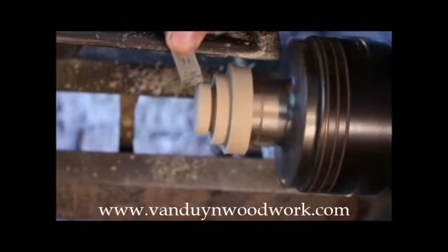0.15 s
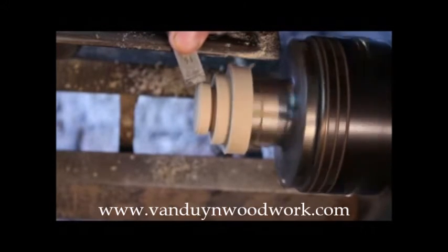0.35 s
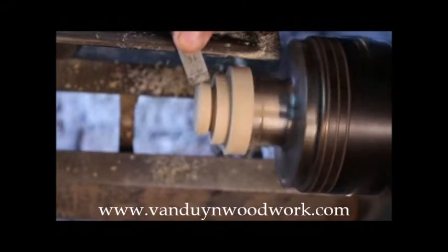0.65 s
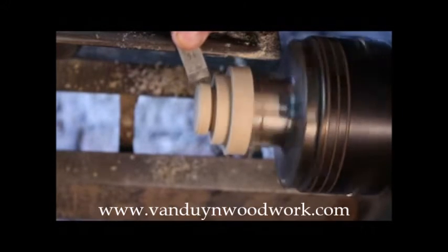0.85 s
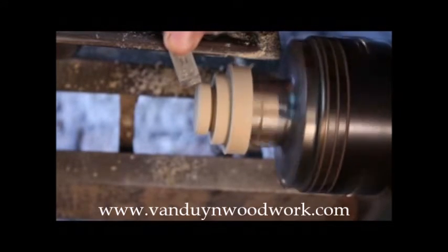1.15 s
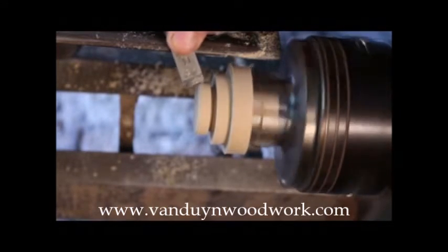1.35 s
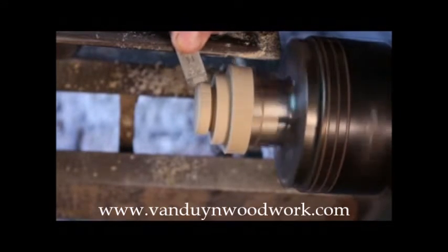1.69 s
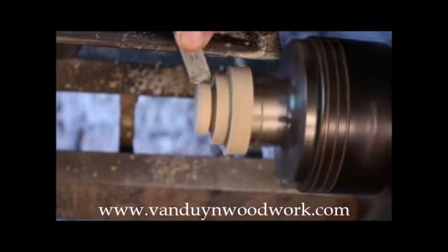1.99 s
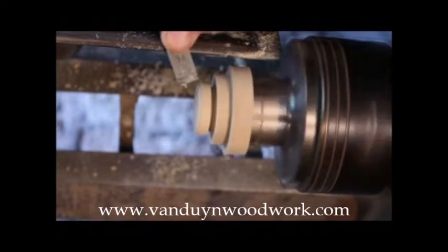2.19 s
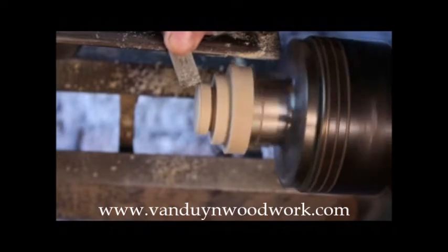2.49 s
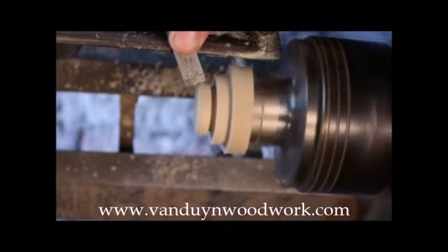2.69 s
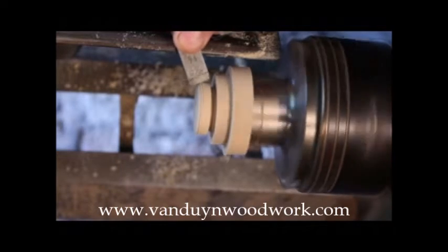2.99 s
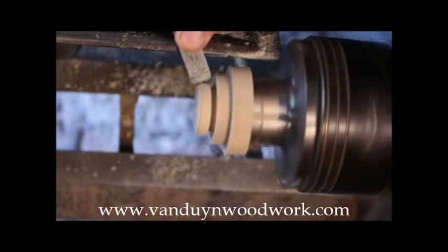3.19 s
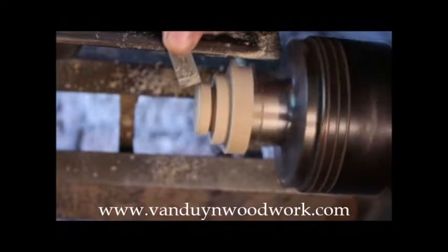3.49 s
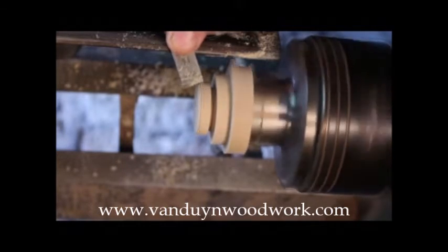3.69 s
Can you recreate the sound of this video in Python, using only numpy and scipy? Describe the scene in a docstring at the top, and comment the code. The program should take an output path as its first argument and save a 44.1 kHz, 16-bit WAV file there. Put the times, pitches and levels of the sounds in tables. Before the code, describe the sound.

Harsh scraping of a toothed tool on spinning wood, repeated four times above soft machine hum

```python
"""Thread chasing at a wood lathe

In a workshop, close to the microphone, a steel chaser is drawn four times along slowly turning wood.
Random clicks of tearing fibres ring the wood, rest, post and tool; the grain colours every turn alike.
Brief falling squeaks come from the edge. Between passes the motor hum and the shop remain,
made of shaped noise and a few sines, with three faint taps of the lifted tool."""
import sys
import numpy as np
from scipy.fft import rfft, irfft, next_fast_len
from scipy.io import wavfile
from scipy.ndimage import map_coordinates

SR = 44100
rng = np.random.default_rng(int(sys.argv[2]) if len(sys.argv) > 2 else 0)


def to_wav(sig):
    """Store sig (one row per channel, or 1-D mono) as 16-bit WAV at the path in sys.argv[1].

    Samples outside -1..1 are clipped; the rate is SR.
    """
    pcm = np.clip(np.atleast_2d(sig), -1, 1) * 32767
    pcm = np.round(pcm).astype(np.int16)
    wavfile.write(sys.argv[1], SR, pcm.T)  # frames by channels


N = 169785


def amp(db):
    """Amplitude factor of a level in dB."""
    return 10 ** (np.asarray(db) / 20)


def unit(x):
    """Scale to an RMS of one."""
    return x / np.sqrt(np.mean(x ** 2) + 1e-20)


def along(points, hz):
    """Read a (frequency, value) curve on a log frequency axis."""
    f, v = np.transpose(points)
    return np.interp(np.log(hz + 1), np.log(f + 1), v)


def wobble(rate):
    """A smooth random curve with rate knots a second."""
    knots = rng.standard_normal(int(N * rate / SR) + 4)
    return map_coordinates(knots, [np.arange(N) * rate / SR])


def filtered(x, response):
    """Filter by a complex response of frequency, with zero padding against wrap-around."""
    size = next_fast_len(N + SR // 2)
    spectrum = rfft(x, size) * response(np.fft.rfftfreq(size, 1 / SR))
    return irfft(spectrum, size)[..., :N]


def resonances(modes):
    """Causal response of damped resonances, summed with alternating sign."""
    def response(f):
        total = 0
        for k, (centre, width, db) in enumerate(modes):
            damping = 1j * f * width
            total = total + (-1) ** k * amp(db) * damping / (centre ** 2 - f ** 2 + damping)
        return total
    return response


def humps(rows, hz):
    """Bell-shaped lifts or dips in dB."""
    return sum(db / (1 + (2 * (hz - centre) / width) ** 2) for centre, width, db in rows)


# Phase lead of the left microphone port over the right: pitch_hz, lead_rad
PORT_LEAD = [(30, 1.2), (80, 0.36), (160, 0.65), (400, .05), (2000, .2), (8000, 1.08)]


def stereo(pair, alike, balance):
    """Mix two unrelated versions into left and right with a set likeness, balance and phase lead."""
    def mid_side(hz):
        angle = np.arccos(np.clip(along(alike, hz), -1, 1)) / 2
        return np.array([np.cos(angle), np.sin(angle)])

    def ports(hz):
        half = amp(along(balance, hz) / 2) * np.exp(.5j * along(PORT_LEAD, hz))
        return np.array([half, 1 / half])

    mid, side = filtered(pair, mid_side)
    return filtered(np.array([mid + side, mid - side]), ports)


# Spectrum of the machine and shop noise before scaling: pitch_hz, level_db (per Hz)
SHOP_SPECTRUM = [(15, -60.5), (25, -22.5), (124, -3), (202, -10.5), (239, -4), (264, -17.5), (345, -6),
                 (389, -12), (484, -7), (648, -11.5), (714, -7), (806, -13), (933, -11.5), (1410, -12.5),
                 (1670, -15), (2180, -20), (6510, -26.5), (7720, -21), (8300, -36.5), (10800, -69),
                 (18300, -120)]
# Casing resonances over that noise: pitch_hz, width_hz, lift_db
CASING = [(77.6, 16, 10), (145, 4.4, 4.5), (310, 45, 3), (607, 34, 6), (922, 60, 2.5), (1117, 35, 12.5),
          (1181, 70, 7), (1295, 42, 7), (1450, 140, -4.5), (1639, 45, 10), (1702, 60, 4.5), (7650, 270, 8)]
# Left-right likeness: pitch_hz, likeness (0 to 1)
SHOP_ALIKE = [(60, 0.6), (160, 0.9), (420, 0.94), (1120, 0.78), (2970, 0.47), (7880, 0.35)]
# Left over right: pitch_hz, balance_db
SHOP_BALANCE = [(60, 5.5), (160, 0.5), (420, 1.5), (1120, 0.5), (2970, 0.5), (7880, -0.5)]
# Mains buzz, one entry a tone: order (multiple of the base pitch), and level_db
BUZZ_ORDERS = [2, 4, 6, 8, 10]
BUZZ_LEVELS = [-64, -65, -55.5, -58.5, -59.5]
SHOP_DB, BUZZ_BASE_HZ = -41, 119.3


def lathe():
    """Motor and shop: noise lifted by casing resonances, and mains buzz of unsteady level and phase."""
    t = np.arange(N) / SR
    noise = filtered(rng.standard_normal((2, N)),
                     lambda hz: amp(along(SHOP_SPECTRUM, hz) + humps(CASING, hz)))
    buzz = 0
    for order, db in zip(BUZZ_ORDERS, BUZZ_LEVELS):
        level = amp(db + 2.5 * wobble(12)) * np.sqrt(2)
        phase = 2 * np.pi * order * BUZZ_BASE_HZ * t + .6 * wobble(15)
        buzz = buzz + level * np.sin(phase)
    unsteady_level = amp(SHOP_DB + 0.8 * wobble(9.4) + 0.4 * wobble(40))
    return stereo(unsteady_level * unit(noise), SHOP_ALIKE, SHOP_BALANCE) + buzz


# Resonances of the steel tool and the post: pitch_hz, width_hz, level_db
BLADE = [(2208, 160, -1.5), (2328, 100, 1.5), (2408, 88, -4)]
SHANK = [(2931, 82, -1), (3123, 115, 1.5), (3800, 240, -8.5), (4223, 123, -5), (4760, 330, -11)]
POST = [(1839, 37, -1.5), (1973, 67, 1), (2485, 112, -8)]
# The lifted tool grazes the rest or the wood: start_s, level_db, blade_over_shank_db
TAPS = [(2.125, -50, -11.5), (3.586, -42, -3), (3.608, -49.5, -5.5)]
TAP_DECAY_S = 0.024


def taps():
    """Faint touches: decaying bursts of noise ring the shank, then the blade and post together."""
    t, out = np.arange(N) / SR, 0
    for modes, blade_share in ((SHANK, 0), (BLADE + POST, 1)):
        push = 0
        for start, db, blade_db in TAPS:
            decay = (t > start) * np.exp(-np.abs(t - start) / TAP_DECAY_S)
            push = push + amp(db + blade_share * blade_db) * decay
        grit = rng.standard_normal((2, N))
        ring = resonances(modes)
        out = out + filtered(grit * push, ring) / np.std(filtered(grit, ring))
    return out


# Short chatter of the edge: middle_s, pitch_hz, level_db
SQUEAKS = [(0.201, 1830, -32.5), (0.303, 1744, -33.3), (0.339, 2250, -31.7), (0.389, 2002, -30.3),
           (0.39, 1798, -29.2), (0.412, 1614, -28.9), (0.439, 1604, -33.7), (0.45, 2228, -29.5),
           (0.496, 2282, -33.7), (0.539, 2260, -31.8), (0.603, 1862, -31.0), (0.614, 1625, -31.2),
           (0.637, 2207, -27.9), (0.694, 2304, -31.1), (0.727, 1959, -31.8), (0.739, 2271, -30.5),
           (0.741, 2487, -33.7), (1.235, 2185, -32.8), (1.34, 2250, -30.5), (1.402, 1862, -28.0),
           (1.415, 1636, -33.2), (1.448, 2207, -28.3), (1.492, 2282, -31.7), (1.499, 1981, -31.6),
           (1.5, 1679, -33.6), (1.525, 1970, -29.8), (1.543, 2250, -32.9), (1.602, 1862, -27.6),
           (1.61, 1614, -31.5), (1.644, 2174, -31.8), (1.69, 2357, -29.3), (1.699, 1658, -31.9),
           (1.702, 1927, -29.9), (1.767, 1841, -33.1), (1.78, 1647, -29.4), (1.798, 2530, -32.0),
           (1.8, 1916, -28.3), (1.812, 1614, -32.4), (1.823, 1959, -30.7), (1.848, 2228, -27.6),
           (1.892, 2314, -32.2), (1.919, 1959, -28.9), (2.428, 2228, -32.5), (2.556, 2207, -33.2),
           (2.571, 1647, -32.1), (2.642, 2271, -32.5), (2.696, 1970, -32.7), (2.717, 1970, -33.4),
           (2.745, 2196, -30.0), (2.776, 1614, -32.0), (2.783, 1991, -26.7), (2.843, 2185, -29.0),
           (2.854, 1668, -33.1), (2.886, 2347, -31.4), (2.91, 2476, -32.4), (2.945, 2185, -30.9),
           (2.981, 1658, -33.7), (2.983, 1991, -28.6), (3.017, 1614, -32.2), (3.042, 2217, -25.7),
           (3.07, 1841, -33.2), (3.071, 2045, -31.9), (3.781, 1927, -32.4), (3.84, 2239, -32.4)]
HALF_SQUEAK_S = .018
SQUEAK_SAG = .025  # pitch falls from this fraction above to this fraction below
PHASE_STEP_RAD = .03  # spread of the random phase step at each sample


def squeaks():
    """Chatter of the edge on the grain: brief swelling tones that fall in pitch and wander in phase."""
    out = np.zeros((2, N + SR))
    u = np.linspace(-1, 1, round(2 * HALF_SQUEAK_S * SR))
    swell = np.cos(np.pi * u / 2) ** 2
    for middle, hz, db in SQUEAKS:
        wander = PHASE_STEP_RAD * np.cumsum(rng.standard_normal((2, len(u))), axis=1)
        fall = 2 * np.pi * hz * HALF_SQUEAK_S * (u - SQUEAK_SAG * u ** 2 / 2)
        phase = fall + wander + rng.uniform(0, 2 * np.pi, (2, 1))
        first = round((middle - HALF_SQUEAK_S) * SR)
        out[:, first:first + len(u)] += amp(db) * np.sqrt(2) * swell * np.sin(phase)
    return out[:, :N]


TURNS_PER_S = 5.015


def round_turn(steps_db):
    """A pattern fixed to the wood, smoothly repeated every turn."""
    place = np.arange(N) / SR * TURNS_PER_S % 1 * len(steps_db) - .5
    return map_coordinates(np.array(steps_db, float), [place], mode="grid-wrap")


TEARS_PER_S, TEAR_SPREAD_DB = 6000, 2


def tears():
    """Fibres breaking: dense random clicks of uneven size and either sign, in clumps."""
    size_draw, sign_draw, when_draw = rng.random((3, 2, N))
    size = amp(-TEAR_SPREAD_DB * np.log(size_draw + 1e-9)) * np.sign(sign_draw - .5)
    return size * (when_draw < TEARS_PER_S / SR) * amp(0.35 * wobble(120))


# One table a pass: time_s, cut_db, then over the cut: rest_db, wood_db, hiss_db
PASSES = [
    [(0.04, -43, 5.5, -5.5, -9.5), (0.086, -35, -1.5, -15, -5), (0.308, -31, 1.5, -9, -2),
     (0.61, -29.5, 3, -8, -1.5), (0.67, -29.5, 3.5, -9, -3), (0.74, -29.5, -2, -11, -1.5),
     (0.788, -31.5, -0.5, -10, -7.5), (0.82, -41, 3.5, -6.5, -7.5), (0.852, -48.5, -1, 1, -7.5),
     (0.87, -57, -8, -12, -19)],
    [(1.153, -38.5, 1.5, -8, -10.5), (1.187, -35.5, -1, -18.5, -9), (1.3, -31, -1.5, -10, -5),
     (1.45, -30, 1, -12, -1.5), (1.573, -28.5, 2, -9, -1.5), (1.613, -29.5, 2.5, -8, -1.5),
     (1.78, -29, 0.5, -9, -2.5), (1.927, -29.5, 3, -6.5, -1.5), (1.989, -32.5, -2, -8, -7),
     (2.02, -39.5, 1.5, -10.5, -11.5), (2.051, -52, -2, -4, -7), (2.07, -55.5, -2, -9, -5.5)],
    [(2.383, -38.5, 4, -10, -5), (2.413, -33.5, 3, -8, -1), (2.483, -35, 0.5, -11, -4.5),
     (2.493, -31.5, -2, -16, 0.5), (2.579, -31, 3, -5.5, -1), (2.611, -35, 4.5, -6.5, -4),
     (2.705, -30, 1.5, -12, -1.5), (2.8, -30.5, 1.5, -7, -2), (2.92, -29.5, 2, -7.5, -3),
     (3.055, -30, 1, -8, -1.5), (3.097, -27, -0.5, -10, -4.5), (3.209, -34.5, 0.5, -11.5, -6),
     (3.245, -43.5, -0.5, -10, -7.5), (3.29, -60.5, 6, -21, -4.5)],
    [(3.642, -42, 0.5, -19, -16), (3.655, -37.5, -2.5, -11, -8.5), (3.699, -32, -4.5, -17.5, -8),
     (3.72, -34, 2, -22.5, -6.5), (3.757, -32.5, -2.5, -15.5, -11), (3.779, -31.5, -4, -28, -9),
     (3.825, -32, 1.5, -14, -4), (3.85, -32.5, 2, -19, -1)],
]
# Resonances of the wood, tool rest and teeth: pitch_hz, width_hz, level_db
WOOD = [(140, 52, -15.5), (235, 77, -16), (388, 88, -8.5), (536, 27.5, 1), (618, 41, -2.5), (713, 50, 1)]
REST = [(1264, 90, -4), (1454, 33, -1), (1613, 73, 1), (1655, 46, 0), (1734, 44, -1.5)]
TEETH = [(5486, 140, 4), (5857, 710, 8), (6940, 410, -3), (6800, 510, 1)]
# Drive of each part by the grain, in twenty even steps round one turn: drive_db
WOOD_TURN = [1, 1, 2, 3, 2, 3, 0, 1, 0, 0, -1, -1, -4, -2, -1, -1, -3, -2, -3, -1]
REST_TURN = [0.5, 3, -1, 1, -0.5, -5, -2, -0.5, -2.5, -2.5, -1.5, -2, -3.5, -3.5, -2, -2, -3, -4, -0.5, 1]
POST_TURN = [3, 1, -0.5, -0.5, -7.5, -6.5, -4, 1, -4.5, -2, 2.5, 1, 0.5, -1, -6.5, -8.5, 0.5, -0.5, 1, 1]
BLADE_TURN = [1, -5.5, 0.5, 4, -0.5, 6, -4.5, -0.5, -4, 3, -4.5, -3, 3, 0.5, 3.5, 2, -1.5, -2.5, -7.5, -1]
SHANK_TURN = [1, -0.5, -0.5, -3.5, -1.5, -3, -3, -4.5, -3.5, -2.5, -3, -4, -1.5, -5, -3, -5.5, -2, -4.5,
              -0.5, 0]
TEETH_TURN = [1, -1, -1, -1, -2, -3, -2, -2, -1, 2, 2.5, 0, -1, -2, -1, -2, 1, -1, 2, 2]
# Plain scrape between the resonances: pitch_hz, level_db (per Hz)
PLAIN_SCRAPE = [(470, -59), (800, -15), (1500, -13), (2200, -10), (2700, -4), (3040, -0.5), (3480, -11),
                (5240, -15.5), (5830, -10), (8200, -26), (10700, -66.5), (18000, -120)]
# Narrow bands of the scrape, mostly dulled: pitch_hz, width_hz, change_db
SCRAPE_BANDS = [(830, 36, -5.5), (2753, 39, -10.5), (3330, 73, 2.5), (5130, 50, -8.5)]
# Left-right likeness: pitch_hz, likeness (0 to 1)
CUT_ALIKE = [(60, 0.45), (120, 0.56), (240, 0.35), (490, 1), (970, 0.83), (1960, 0.84), (3930, 0.73),
             (7880, 0.76)]
# Left over right: pitch_hz, balance_db
CUT_BALANCE = [(60, -8.5), (120, 4.5), (240, -4), (490, -1), (970, 2), (1960, -1), (3930, 5), (7880, 3)]
# Shares of the level that drives each part
REST_DB, POST_DB, BLADE_DB, SHANK_DB, SCRAPE_DB = -5.5, -6.5, -11, 0, -2.5
BITE_S = .006  # fade-in just before the first time of a pass
SHARED_TEARING = 0.46  # part of the tearing power that all parts feel alike
CHANCE_DB = .7  # random swell of each part


def chaser():
    """Tearing fibres ring every part, driven by the pass and by the grain under the teeth."""
    t = np.arange(N) / SR
    times, *columns = np.transpose(np.concatenate(PASSES))
    cut_db, rest_db, wood_db, hiss_db = [np.interp(t, times, c) for c in columns]
    touch = 0
    for rows in PASSES:
        bite = np.clip((t - rows[0][0]) / BITE_S + 1, 0, 1)
        touch = touch + bite * (t <= rows[-1][0])

    parts = [
        (resonances(WOOD), WOOD_TURN, wood_db),
        (resonances(REST), REST_TURN, rest_db + REST_DB),
        (resonances(POST), POST_TURN, rest_db + POST_DB),
        (resonances(BLADE), BLADE_TURN, rest_db + BLADE_DB),
        (resonances(SHANK), SHANK_TURN, SHANK_DB),
        (resonances(TEETH), TEETH_TURN, hiss_db),
        (lambda hz: amp(along(PLAIN_SCRAPE, hz)) * (hz > 300), SHANK_TURN, SCRAPE_DB),
    ]
    shared = tears()
    out = squeaks() + taps()
    for response, turn, share_db in parts:
        grit = np.sqrt(SHARED_TEARING) * shared + np.sqrt(1 - SHARED_TEARING) * tears()
        steady_rms = np.sqrt(np.mean(filtered(grit, response) ** 2))
        drive_db = cut_db + share_db + round_turn(turn) + CHANCE_DB * wobble(29.96)
        out = out + filtered(grit * touch * amp(drive_db), response) / steady_rms
    out = filtered(out, lambda hz: amp(humps(SCRAPE_BANDS, hz)))
    return stereo(out, CUT_ALIKE, CUT_BALANCE)


def scene():
    """The lathe and shop behind, the chaser in front."""
    return lathe() + chaser()


# Microphone response: pitch_hz, level_db
MIC = [(6500, 0.5), (7300, -4.5), (7750, -1), (8000, -13), (8300, -1)]
TOP_HZ = 8300


def record(dry):
    """The microphone shapes the treble, and nothing passes at or above its band limit."""
    return filtered(dry, lambda hz: amp(along(MIC, hz)) * (hz < TOP_HZ))


dry = scene()
out = record(dry)
to_wav(out)
```